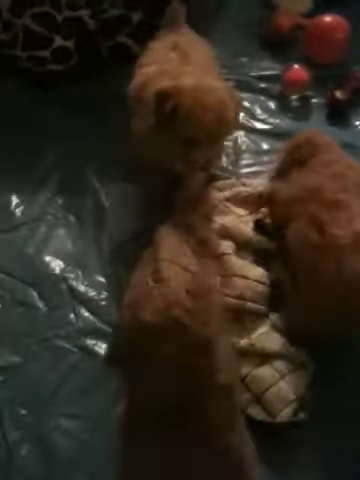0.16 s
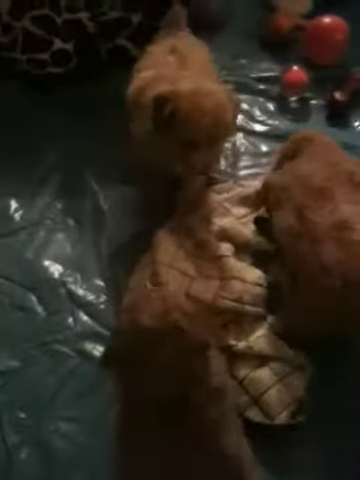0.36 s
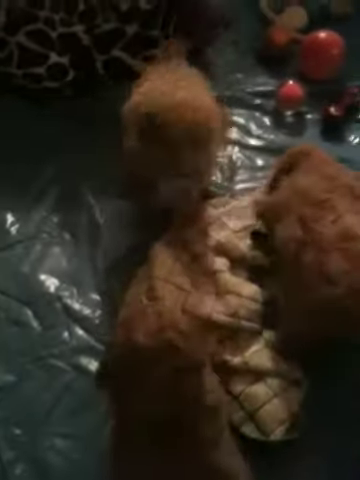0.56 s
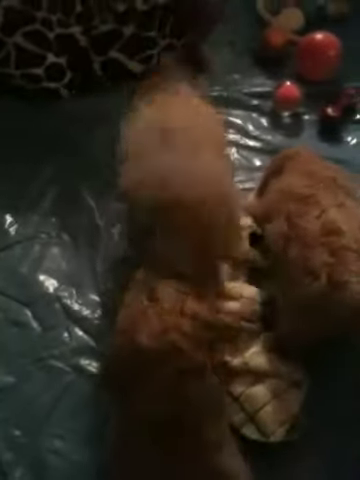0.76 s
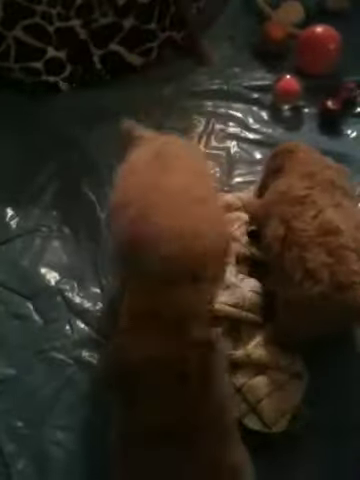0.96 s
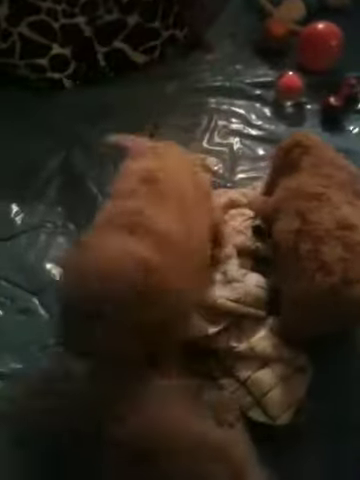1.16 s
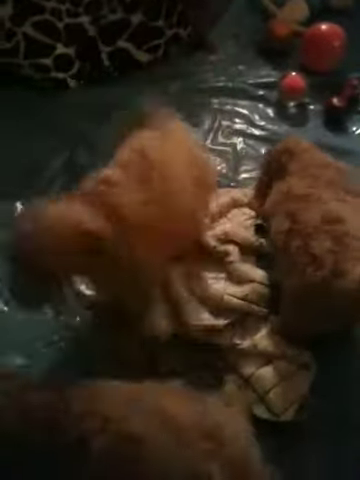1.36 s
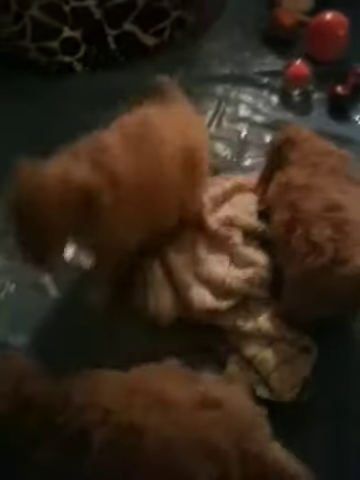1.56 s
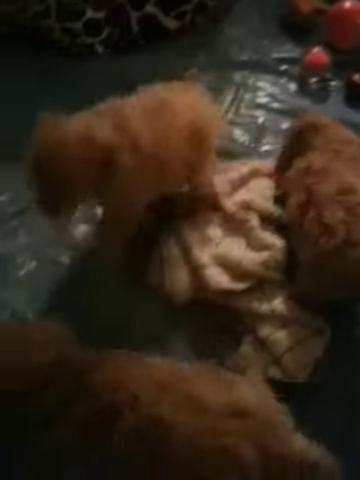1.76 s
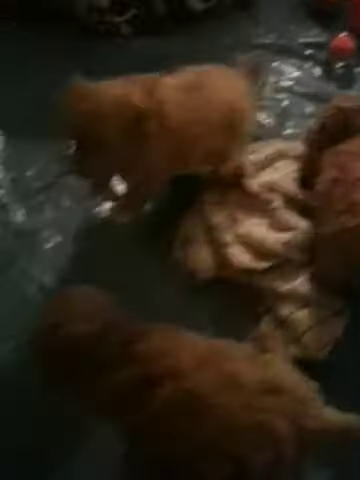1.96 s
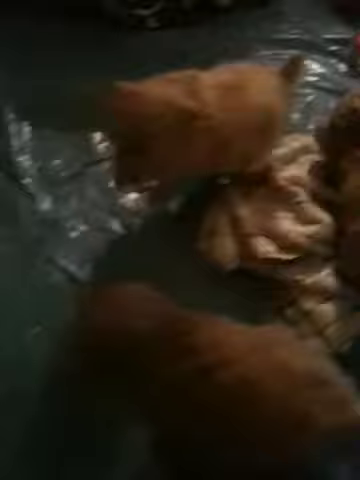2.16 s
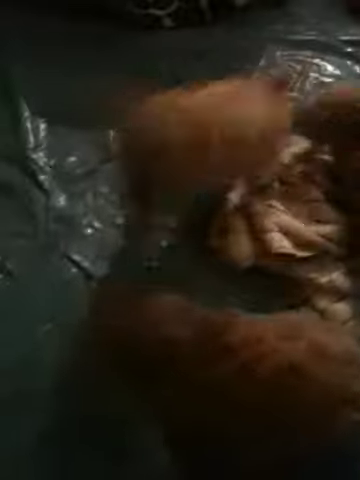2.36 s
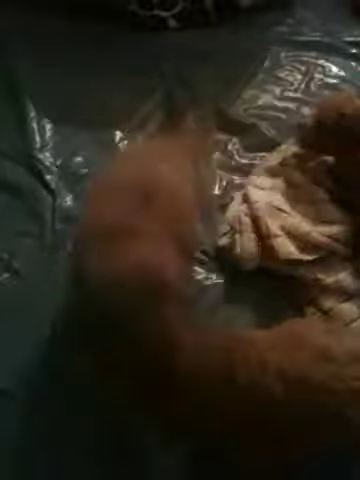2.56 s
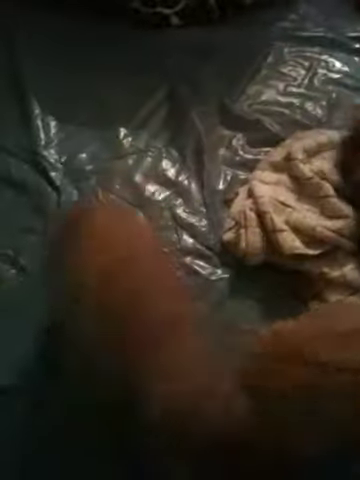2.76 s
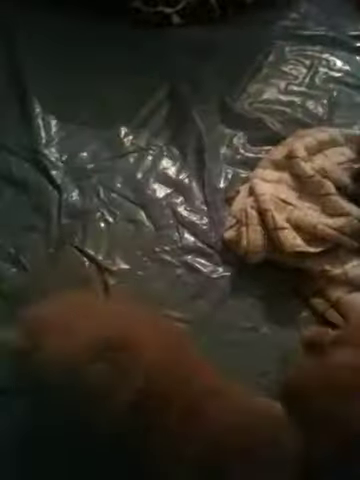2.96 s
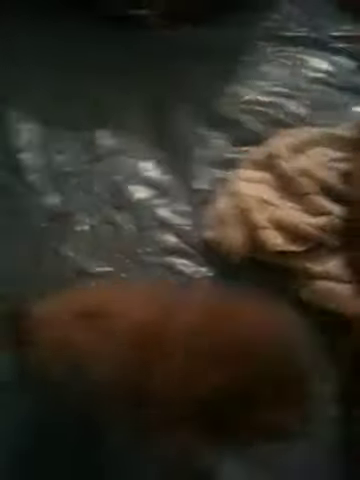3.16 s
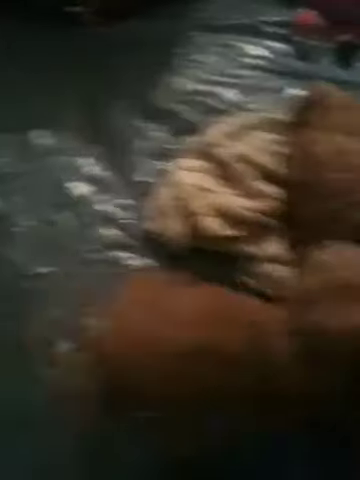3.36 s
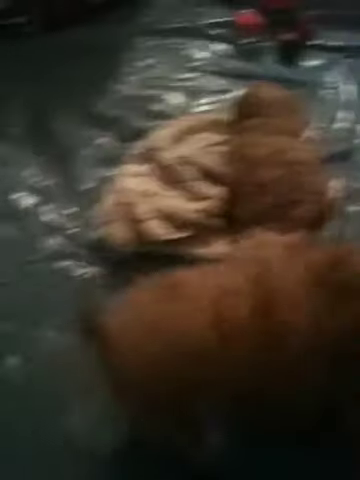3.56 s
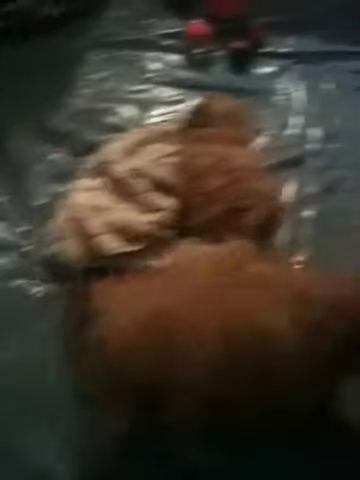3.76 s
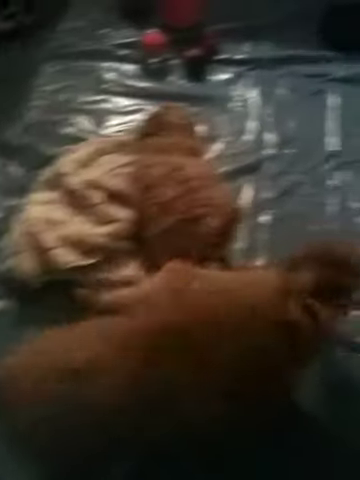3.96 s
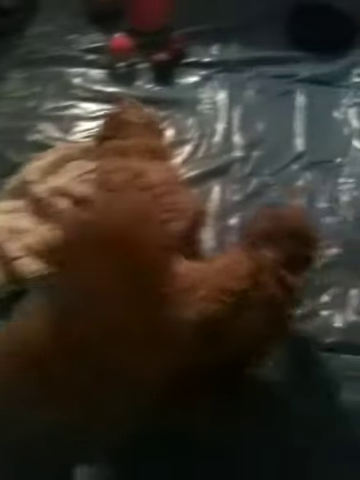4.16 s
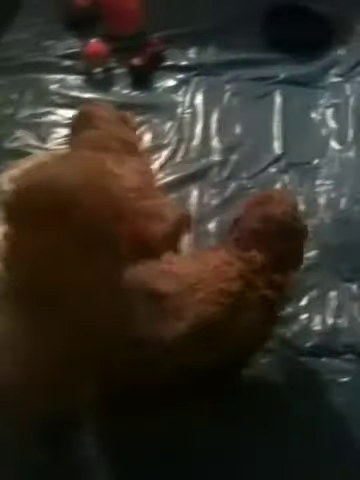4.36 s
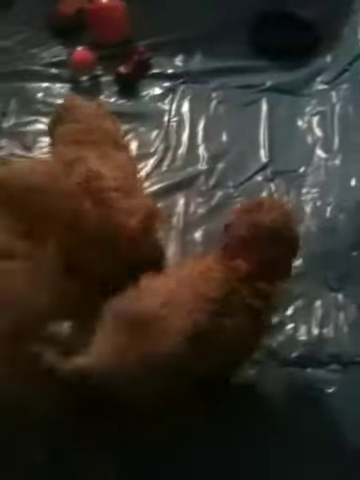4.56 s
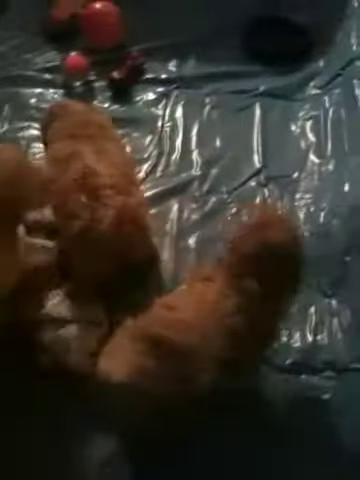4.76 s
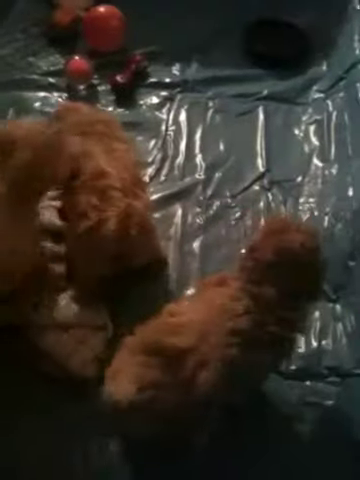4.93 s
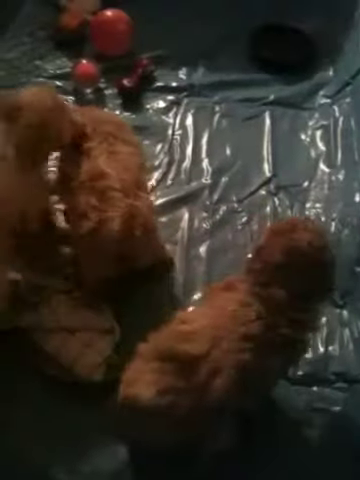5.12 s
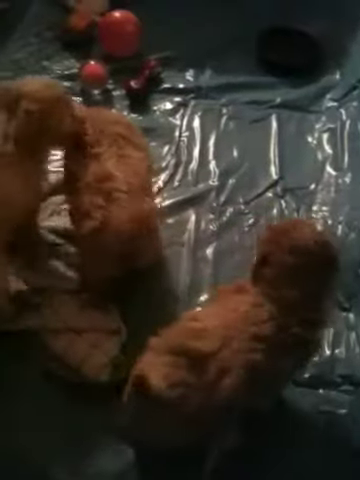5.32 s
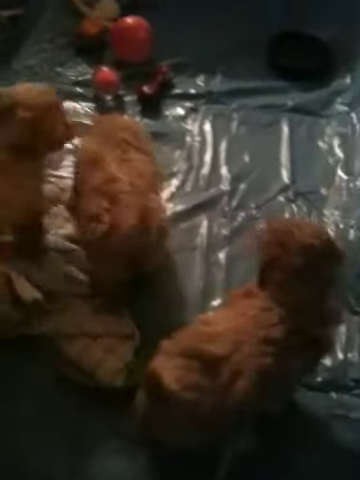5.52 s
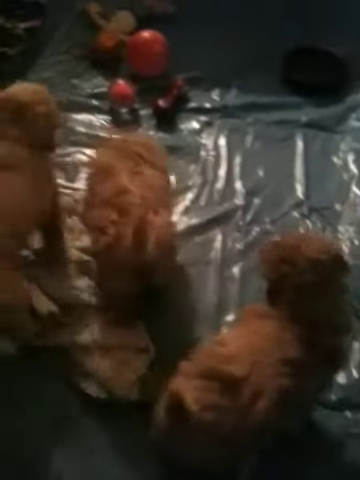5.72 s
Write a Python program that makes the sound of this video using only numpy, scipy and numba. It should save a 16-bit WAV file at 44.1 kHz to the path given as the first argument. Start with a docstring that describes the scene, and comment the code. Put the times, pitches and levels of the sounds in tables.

```python
"""Young puppies tussle on a plastic sheet in a small, quiet room, over faint air noise and mains hum.
A short growl opens the scene: uneven vocal-fold pulses excite the moving resonances of throat and mouth.
The sheet rustles by friction, bodies bump softly, and creases buckle under paws with a snap.
From 0.8 s come longer growls that throb about 25 times a second; after 3.9 s they are brief again.
Near 5 s a puppy huffs, forcing turbulent air through its nose."""
import sys
import numpy as np
from scipy import signal
from scipy.fft import rfft, irfft
from scipy.io import wavfile
from scipy.ndimage import uniform_filter1d
from numba import njit

SR = 44100
rng = np.random.default_rng(int(sys.argv[2]) if len(sys.argv) > 2 else 0)


def wav_out(sig):
    """Save sig, one row per channel (or a flat mono array), as 16-bit PCM at SR to the path in sys.argv[1]."""
    wavfile.write(sys.argv[1], SR, np.round(np.clip(np.atleast_2d(sig).T, -1, 1) * 32767).astype(np.int16))


N = 255334
TIME = np.arange(N) / SR


def undb(db):
    """Level in decibels to amplitude ratio."""
    return 10 ** (np.asarray(db) / 20)


def unit(x):
    """Normalisation to rms 1."""
    return x / np.sqrt(np.mean(x ** 2))


def steady(x, span_s=0.13):
    """Division by the running rms holds the short-term level constant."""
    size = int(span_s * SR)
    return x / np.sqrt(uniform_filter1d(uniform_filter1d(x ** 2, size), size) + 1e-18)


def curves(rows):
    """Linear interpolation of each column over the times in the first."""
    times, *columns = np.transpose(rows)
    return [np.interp(TIME, times, column) for column in columns]


def walk(rate):
    """Random modulation: straight lines between `rate` Gaussian values a second."""
    knots = rng.standard_normal(4096)
    return 0.51 * np.interp(TIME * rate, np.arange(len(knots)), knots)


def swells(rows):
    """Envelope of rounded peaks with exponential flanks, one per (t/s, level/dB, half length/s)."""
    return sum(undb(db) * np.exp(1 - np.hypot(1, (TIME - s) / half_s)) for s, db, half_s in rows)


def colour(x, points, size=1024):
    """Minimum-phase filter of unit power with the outline (f/Hz, level/dB)."""
    hz, db = np.transpose(points)
    grid = np.maximum(np.arange(size // 2 + 1) * SR / size, 1)
    cepstrum = irfft(np.log(undb(np.interp(np.log(grid), np.log(hz), db))))
    cepstrum[1:size // 2] *= 2
    cepstrum[size // 2 + 1:] = 0
    response = irfft(np.exp(rfft(cepstrum)))
    return signal.fftconvolve(x, response / np.linalg.norm(response))[:len(x)]


@njit
def svf(x, tuning, damping):
    """State-variable band-pass: two integrators in a loop form a tunable damped oscillator."""
    y, band, low = np.empty(len(x)), 0., 0.
    for i in range(len(x)):
        g, k = tuning[i], damping[i]
        v = (band + g * (x[i] + 1e-18 - low)) / (1 + g * (g + k))
        band, low, y[i] = 2 * v - band, low + 2 * g * v, k * v
    return y


def ring(x, hz, width_hz):
    """Second-order resonance with gain 1 at its centre."""
    hz = np.minimum(hz, SR / 3) * np.ones(len(x))
    return svf(x, np.tan(np.pi * hz / SR), width_hz / hz)


def formant(x, hz, width_hz, skirt_hz):
    """Three resonances in cascade give a sharp tip and steep skirts, held at a steady level."""
    return steady(ring(ring(ring(x, hz, width_hz), hz, skirt_hz), hz, skirt_hz))


# spectrum of the room air: f/Hz, level/dB
AIR_SPECTRUM = [(35, -63.5), (60, -19.5), (112, -10), (171, -3.5), (433, -8.5), (585, -11), (705, -12),
                (2250, -22), (9740, -22), (15500, -21)]


def background(hum_hz=121, hum_db=-80, air_db=-71.5):
    """Superposition of a mains tone, wavering in level, and the broadband noise of the room air."""
    hum = np.sqrt(2) * np.sin(2 * np.pi * hum_hz * TIME) * undb(hum_db + 1.1 * walk(1.8))
    return hum + undb(air_db) * colour(rng.standard_normal(N), AIR_SPECTRUM)


# growls: t/s, length/s, chest level/dB, level change/dB, attack/s, release/s, first, middle and last f/Hz,
# throb rate/Hz, its slowing/(Hz/s), throb depth/1, pitch swing in a throb/1
GROWL_GESTURES = [(0, 0.16, -45.5, -24, 0.0014, 0.058, 292.6, 278.3, 255, 16.7, 1, 0.046, 0.15),
                  (0.762, 0.43, -48, 0.5, 0.058, 0.06, 399.2, 431, 417, 24.8, 0, 0.27, 0.13),
                  (1.361, 0.38, -49, -2.5, 0.0076, 0.076, 384.8, 315, 175, 27.5, 0, 0.46, 0.27),
                  (1.945, 0.34, -52, -6, 0.0085, 0.0057, 255.4, 254.2, 262.5, 29.2, 7.5, 0.52, 0.36),
                  (2.283, 0.16, -56, -7.5, 0.0083, 0.024, 291, 321.2, 286, 24.4, 0, 0.74, 0.26),
                  (2.654, 0.097, -64.5, 3.5, 0.015, 0.011, 224, 220.3, 235, 9.9, 2, 0.0085, 0.089),
                  (2.745, .555, -45.5, -7, .04, 0.076, 305.1, 360.1, 320.4, 30.2, 16, 0.32, 0.42),
                  (3.482, 0.388, -46.5, -6, 0.02, 0.09, 285.1, 315.1, 304.6, 28.6, 0.5, 0.37, 0.34),
                  (3.905, .17, -57.5, 16.5, 0.013, 0.077, 270.2, 346, 330.6, 22.7, -0.5, 0.0034, 0.4),
                  (4.214, 0.08, -65, -7, 0.0198, 0.032, 271, 274, 260, 12, -3, 0, 0.21),
                  (4.366, 0.11, -54.5, -4, 0.027, 0.027, 263.2, 277, 253.7, 25.2, -2.5, 0.2, 0.14),
                  (4.592, 0.15, -48, -10, 0.038, 0.058, 254.5, 265, 229.5, 8.8, 0.5, 0.095, 0.2),
                  (4.867, 0.08, -58, 0.5, 0.025, 0.041, 349, 343.2, 326.6, 9.5, 0, 0, 0.2),
                  (5.14, 0.034, -61, 2, 0.019, 0.027, 340, 329, 332, 12.4, 1.5, 0, 0.39)]
# unevenness of vocal-fold closure, low where a growl clears into a tone: t/s, roughness/1
FOLD_ROUGHNESS = [(.1, .35), (.8, .5), (1, .7), (1.37, .3), (1.42, .4), (1.5, .58), (2.22, .65), (2.3, .15),
                  (2.7, .15), (2.78, .6), (3, .58), (3.2, .3), (3.5, .55), (4, .8), (4.25, .35), (4.42, .3),
                  (4.65, .55)]


def larynx(arch_db=5, pitch_sag=.3, gurgle_db=3.2, gurgle_pitch=.08):
    """Amplitude and frequency modulation: level and pitch follow effort, throbbing pressure and flutter."""
    rows = np.array(GROWL_GESTURES)
    current = np.maximum(np.searchsorted(rows[:, 0], TIME, "right") - 1, 0)
    (start, length, db, fade_db, attack, release,
     first_hz, middle_hz, last_hz, rate, slowing, depth, swing) = rows[current].T
    rough, = curves(FOLD_ROUGHNESS)
    age = TIME - start
    progress = np.clip(age / length, 0, 1)
    effort = np.clip(age / attack, 0, 1) ** .6 * np.clip((length - age) / release, 0, 1) ** 1.5
    gain = effort * undb(db + fade_db * progress + arch_db * np.sin(np.pi * progress))
    # throbs vary in timing and depth; each peaks early and then sags
    cycle = ((rate - slowing * age / 2) * age + .1 * walk(12)) % 1
    swell = np.sin(np.pi * cycle ** .72) - 2 / np.pi
    throb = np.maximum(1 + np.pi / 2 * depth * swell * (1 + 0.5 * walk(24)), 0)
    edge_hz = np.where(progress < .5, first_hz, last_hz)
    tune = middle_hz + np.abs(2 * progress - 1) * (edge_hz - middle_hz)
    hz = tune * (1 - pitch_sag * (1 - effort)) * (1 + swing * swell)
    gurgle = rough * walk(70)  # uneven flutter of the throat
    return gain * undb(gurgle_db * gurgle), throb, swell, hz * (1 + gurgle_pitch * gurgle), rough


@njit
def vocal_folds(hz, jitter, shimmer, chance):
    """Irregular oscillation: a pulse per closure, varying in period (jitter) and strength (shimmer)."""
    pulses, phases, phase, cycle = np.zeros(len(hz) + 1), np.empty(len(hz)), 0., 0
    for i in range(len(hz)):
        step = hz[i] * np.exp(jitter[i] * chance[cycle, 0]) / SR
        phase += step
        if phase >= 1:
            phase, cycle = phase - 1, cycle + 1
            # alternating strong and weak closures add a subharmonic
            size = np.exp(shimmer[i] * (chance[cycle, 1] + .6 * (-1) ** cycle))
            pulses[i] += size * phase / step
            pulses[i + 1] += size * (1 - phase / step)
        phases[i] = phase
    return pulses[:-1], phases


def chest_voice(source, phase, core_db=-13, nose_db=6):
    """Low resonances plus the fundamental of the smooth airflow; a nasal resonance lifts a narrow band."""
    chest = steady(ring(ring(source, 400, 370), 290, 270)) + undb(core_db) * np.cos(2 * np.pi * phase)
    chest = chest + undb(nose_db) * ring(chest, hz=429, width_hz=20)
    band = signal.butter(5, [195, 1150], "band", fs=SR, output="sos")
    return steady(signal.sosfilt(band, chest), span_s=0.0079)


# formants of the muzzle; in a wide snarl throat and mouth converge and grow loud: t/s;
# f/Hz of throat, mouth, cheek, lower teeth, upper teeth, lips;
# level/dB re the chest of throat, mouth, cheek, teeth, lips, hiss
MUZZLE_FORMANTS = [(.1, 720, 1990, 2170, 3400, 5800, 6340, -10, -15, -34, -39, -23, -20),
                   (.77, 730, 2000, 2150, 3500, 5330, 6150, 6.5, 4.5, -14, -24, -9, -9),
                   (.815, 790, 1920, 2270, 3530, 4930, 6100, 1, -6.5, -14, -13, -16, -19),
                   (.826, 897, 1900, 2680, 3520, 4770, 6000, 4.5, 6, 5, 5.5, 2, -15),
                   (.865, 950, 2000, 2110, 3700, 4920, 6030, 0.5, 11, -5, 9, 7.5, -7),
                   (.9, 1160, 1700, 2080, 3580, 4880, 7540, 0, 6.5, 8.5, 7.5, 2.5, -3),
                   (.945, 1490, 1430, 2200, 3480, 4570, 7760, 5.5, 12, 0, 5.5, -2.5, -7),
                   (1.01, 1345, 1375, 2080, 3060, 3460, 7600, 8, 16, 10, 13.5, -10, -17),
                   (1.045, 1362, 1439, 2100, 3420, 4100, 7300, 5, 16, 10.5, 8, -8, -11),
                   (1.075, 1030, 1500, 1960, 3900, 4000, 6850, 6.5, 8, 7.5, 3.5, -17, -3),
                   (1.15, 837, 1550, 2120, 4300, 4340, 6660, 5, 0, -4, -10.5, -21, -14),
                   (1.38, 976, 1730, 1966, 3855, 5055, 6600, 1.5, 2, -13, -4, -6, -7.5),
                   (1.46, 973, 1770, 2406, 4100, 4340, 6200, 1, -5, -5, 0, -16, -7),
                   (1.53, 950, 1740, 2440, 4300, 4200, 6060, 0.5, -2.5, -11, -2, -19, -9.5),
                   (1.66, 933, 1820, 2180, 4400, 4820, 6000, -2.5, -4.5, -5.5, -6, -14, -7),
                   (1.96, 791.3, 1950, 2320, 3214, 6077, 5880, -3, -12, -10, -19, -7.5, -17.5),
                   (2.2, 763, 1952, 2285, 3220, 6240, 5800, -0.5, -12, -15, -14.5, -10, -16),
                   (2.3, 679.3, 1957, 2198, 3360, 5750, 5800, 4, -9, -13.5, -18, -15, -24),
                   (2.38, 980, 2020, 2200, 3650, 4750, 6350, 7.5, -3.5, -12, -8, -8, -10),
                   (2.43, 968, 1944, 2250, 3705, 4800, 6320, 3, -19, -17, -18, -12, -16),
                   (2.66, 890, 1500, 2500, 3760, 4700, 6200, -18, -26, -24, -22, -22, -22),
                   (2.73, 940, 1444, 2552, 3740, 4700, 6250, -2, -7, -16, 0, -11, -22),
                   (2.77, 980, 1420, 2569, 3733, 4690, 6204, 5.5, -0.5, -11, 1, -9, -12),
                   (2.85, 1016, 1570, 2520, 3770, 4930, 6450, -0.5, 1.5, -11, -2, -10, -9.5),
                   (2.93, 990, 1730, 2535, 3732, 4336, 7540, -1.5, 1.5, -9, 2.5, -19, -7.5),
                   (3.05, 961.2, 1650, 2522, 3750, 4440, 7627, -1.5, 3.5, -9.5, 1, -25, -12.5),
                   (3.12, 1014, 1733, 2506, 3840, 4947, 6200, -1.5, -3, -5, 0.5, -18, -9),
                   (3.16, 852.3, 1258, 2387, 4200, 5040, 5700, 2.5, -5.5, -4.5, -10, -6, -8),
                   (3.22, 742, 1167, 2272, 4545, 5420, 6430, 2, -3, -10.5, -19, -15, -17),
                   (3.48, 870, 1410, 2090, 3700, 4555, 6665, 1, -6, -4, -11, -23, -15),
                   (3.535, 900, 1390, 2100, 3740, 4564, 6600, 4, -9, -8.5, -12, -19, -9),
                   (3.58, 982, 1600, 2500, 3830, 4448, 6415, 1, -6.5, -14, -15.5, -22, -28),
                   (3.635, 1061, 1845, 2620, 3970, 4225, 5402, 4, 1.5, -1.5, -1, -4.5, -9),
                   (3.69, 975, 1854, 2631, 3950, 4118, 5540, 2, 0, -2.5, -4, -13, -1.5),
                   (3.78, 1100, 1624, 2320, 3909, 4702, 6514, -2, 2.5, -3, -10, -25, -18),
                   (3.92, 745.5, 1820, 2154, 3500, 5782, 6966, -3, -24, -27, -30, -31, -23),
                   (4.04, 850, 1795, 2120, 3647, 5805, 7050, -1.5, -13.5, -14, -19, -20, -14.5),
                   (4.4, 819.4, 2210, 2380, 3687, 5780, 6715, -1.5, -13.5, -14.5, -25, -24, -23),
                   (4.65, 893, 1790, 2521, 3486, 4210, 6500, -6.5, -13.5, -13.5, -11.5, -22, -22)]


def growls(jitter=.145, shimmer=.4, quiver=.015, wander=0.069, lip_flap=.07):
    """Source-filter principle: fold pulses and breath excite formants that move with jaw and lips."""
    gain, throb, swell, hz, rough = larynx()
    *centres, throat_db, mouth_db, cheek_db, teeth_db, lips_db, hiss_db = curves(MUZZLE_FORMANTS)
    # the soft muzzle quivers with each throb, and every resonance wanders a little
    throat_hz, mouth_hz, cheek_hz, lower_hz, upper_hz, lips_hz = (
        centre * (1 + quiver * swell + wander * walk(30)) for centre in centres)
    pulses, phase = vocal_folds(hz, jitter * rough, shimmer * rough, rng.standard_normal((8192, 2)))
    pulses = steady(pulses)
    # air escapes once a cycle and carries more of the treble than of the bass
    air = steady(rng.standard_normal(N) * np.exp(-phase / 1.1))
    dark, warm, bright = (pulses + share * rough * air for share in (.25, .7, 1.4))
    rattle = undb(-4.5) * rough * formant(air, 263.5, 110, 190)  # the loose throat
    throat = steady(formant(warm, throat_hz, 200, 320) + undb(-0.5) * formant(warm, 604, 300, 650))
    spit = undb(-24.5) * formant(air, 11270, 3500, 3700)  # hiss of the open jaws
    mouth = formant(bright, mouth_hz, 300, 800) + spit
    cheek = formant(bright, cheek_hz, 278.5, 750)
    teeth = steady(formant(bright, lower_hz, 220, 900) + undb(-1.5) * formant(bright, upper_hz, 480, 1900))
    lips = formant(bright, lips_hz * (1 + lip_flap * (throb - 1)), 630, 2700)
    hiss = formant(air, 6930, 3200, 11000)
    low = chest_voice(dark, phase) + rattle + undb(throat_db) * throat
    middle = undb(mouth_db) * mouth + undb(cheek_db) * cheek + undb(teeth_db) * teeth
    high = undb(lips_db) * lips + undb(hiss_db) * hiss
    return gain * (throb * (low + high) + throb ** 0.45 * middle)


# the sheet sliding under the puppies: t/s, level/dB, half length/s
SHEET_SLIDES = [(.05, -67.5, 0.11), (.3, -88, 0.04), (.44, -64, 0.023), (.62, -64.5, 0.012),
                (.72, -72, 0.041), (1.2, -57, 0.04), (1.275, -59.5, 0.026), (1.8, -60.5, 0.056),
                (2.42, -57, 0.045), (2.65, -67.5, 0.095), (3.36, -63, 0.099), (4.1, -56, 0.021),
                (4.46, -66, 0.028), (4.68, -67, 0.063), (5, -71, 0.033), (5.39, -65.5, 0.047)]
# spectrum of the sliding hiss: f/Hz, level/dB
FRICTION_SPECTRUM = [(88, -36), (150, 0.5), (708, -4.5), (930, -4.5), (1400, -4.5), (1540, -2.5),
                     (2550, -8.5), (5130, -6), (7000, -2.5), (14100, -21.5), (15500, -22)]


def rustle(crackles_per_s=420, spread_db=3, crackle_db=-1.5, contact_db=-75.5):
    """Friction noise: fur and paws, never quite still, drag over plastic whose tiny creases give way."""
    grains = (rng.random(N) < crackles_per_s / SR) * rng.standard_normal(N)
    grains *= undb(spread_db * np.minimum(rng.exponential(size=N), 3))
    crackles = unit(colour(grains, CREASE_SPECTRUM))
    friction = unit(colour(rng.standard_normal(N), FRICTION_SPECTRUM) + undb(crackle_db) * crackles)
    # a paw loads the sheet just before each snap
    crinkles = swells([(s - 0.0027, db - 44.5, 0.019) for s, db, *_ in CREASE_SNAPS])
    return friction * (undb(contact_db) + swells(SHEET_SLIDES) + crinkles) * undb(6.1 * walk(31))


# soft impacts of paws and bodies: t/s, level/dB, f/Hz
BODY_BUMPS = [(.14, -51.5, 766), (0.241, -57.5, 159), (0.281, -59.5, 169), (4.877, -55.5, 200)]


def bumps(rise_cycles=1.44):
    """Damped oscillation: each soft impact builds up and dies away within a few swings."""
    out = 0
    for s, db, hz in BODY_BUMPS:
        t = np.maximum(TIME - s, 0)
        rise = hz * t / rise_cycles
        out = out + undb(db) * rise * np.exp(1 - rise) * np.sin(2 * np.pi * hz * t)
    return out


# creases that snap under a paw: t/s, relative level/dB, f/Hz, 60 dB decay time/s
CREASE_SNAPS = [(0.1796, -49.5, 2750, 0.02), (0.394, -46.5, 4460, 0.041), (0.4276, -44, 2959, 0.045),
                (0.9564, -28.5, 3487, .012), (1.112, -26.5, 4000, 0.03), (1.169, -28, 4150, 0.018),
                (1.2318, -27, 7000, 0.013), (1.342, -39, 3980, 0.025), (1.7969, -38.5, 6614, 0.042),
                (2.337, -43, 3435, 0.041), (2.4129, -30, 2995, 0.017), (2.505, -43.5, 2220, 0.012),
                (2.5165, -31, 3940, 0.035), (2.5809, -31, 1890, 0.027), (2.657, -27.5, 3900, 0.018),
                (2.6927, -36, 1881, 0.027), (2.7746, -28.5, 4337, 0.042), (2.8491, -23.5, 3900, 0.034),
                (2.9689, -30, 3504, 0.027), (2.987, -30.5, 3540, 0.028), (3.234, -33, 6200, 0.026),
                (3.3212, -45, 3376, 0.034), (3.3803, -41, 6240, .012), (3.3871, -34, 6926, 0.03),
                (3.4348, -34, 3730, 0.032), (3.47, -25.5, 4260, 0.029), (3.5841, -31, 4000, 0.033),
                (3.7943, -26.5, 4050, 0.016), (3.866, -40, 6156, .015), (3.8763, -33, 4074, 0.018),
                (3.9533, -40.5, 3518, 0.03), (4.095, -40, 2480, .025), (4.436, -47, 6140, .015),
                (4.444, -42, 4004, 0.029), (4.464, -46, 6770, .012), (4.475, -44, 6470, .012),
                (4.486, -33.5, 6760, 0.012), (4.5335, -48, 3035, 0.011), (4.561, -46.5, 6970, 0.018),
                (4.5726, -37.5, 4300, 0.024), (4.6776, -41, 3977, 0.037), (4.71, -41, 3503, 0.034),
                (4.729, -32, 2450, 0.016), (4.78, -35.5, 3897, 0.1), (4.839, -29, 6750, 0.028),
                (5.014, -52, 6950, .012), (5.469, -43.5, 6670, 0.04), (5.506, -53, 3200, 0.0095)]
# spectrum of a buckling crease: f/Hz, level/dB
CREASE_SPECTRUM = [(120, -10), (200, -6.5), (1010, -13), (2380, -2.5), (3010, -4), (3750, -1), (4840, -3.5),
                   (6590, -2), (11200, -11.5), (13400, -30), (15500, -26)]


def snaps(buckle_s=0.0022, tick_gap_s=.007, fold_hz=7000, lead_s=.02, size=8192):
    """Buckling: a crease gives way in a burst and rings out; smaller folds tick just before and after."""
    out = np.zeros(N + size)
    t = np.arange(size) / SR - lead_s
    for s, db, hz, t60 in CREASE_SNAPS:
        noise, crumple = rng.standard_normal((2, size))
        before, after, pitch = rng.uniform(.6, 1.4, 3)
        rise = np.exp(np.minimum(t, 0) / 0.0012)
        burst = np.exp(-np.maximum(t - buckle_s, 0) / 0.0008)
        tail = undb(-2) * np.exp(-np.log(1000) * np.maximum(t, 0) / t60)
        ticks = sum(undb(-15) * np.exp(-np.abs(t - lag * tick_gap_s) / 0.00027) for lag in (-before, after))
        folding = 0.031 * crumple * np.abs(crumple) * np.exp(-np.maximum(t / 0.037, -t / 0.0014))
        blow = colour(noise * (rise * np.maximum(burst, tail) + ticks) + folding, CREASE_SPECTRUM)
        snap = blow + 2.17 * ring(blow, hz, 600) + 1.8 * ring(blow, fold_hz * pitch, 600)
        start = int((s - lead_s) * SR)
        out[start:start + size] += undb(db) * 6 * snap / np.linalg.norm(snap)
    return out[:N]


# puffs of air through a puppy's nose: t/s, level/dB, half length/s
NOSE_HUFFS = [(4.92, -44, 0.018), (5.171, -52, 0.013), (5.35, -51.5, 0.0033)]
# spectrum of a puff: f/Hz, level/dB
HUFF_SPECTRUM = [(350, -57.5), (600, -43), (1070, -2.5), (1360, -13), (2190, 1), (2370, 4), (4230, -1.5),
                 (4650, 1.5), (5040, -1.5), (7250, 4.5), (8750, -12.5), (11900, -14), (13300, -24),
                 (14200, -43.5), (15000, -34)]


def huffs():
    """Turbulence: air forced through the nose makes short swells of noise."""
    return swells(NOSE_HUFFS) * colour(rng.standard_normal(N), HUFF_SPECTRUM)


def room(x, early_db=-10, late_db=-21, t60=0.075, size=16384):
    """Reverberation: early reflections from floor and furniture, then a short diffuse tail."""
    t = np.arange(size) / SR
    early, late = rng.standard_normal((2, size))
    early = unit(early * (t > .002) * np.exp(-t / 0.0097))
    late = unit(ring(late, 1000, 4600) * (t > .012) * np.exp(-np.log(1000) * t / t60))
    response = (undb(early_db) * early + undb(late_db) * late) / np.sqrt(size)
    return x + signal.fftconvolve(x, response)[:N]


def scene():
    """Superposition: puppies and sheet sound in the room over its background, in one channel."""
    direct = growls() + snaps() + bumps() + rustle() + huffs()
    return (room(direct) + background())[None]


def record(dry, bass_hz=70, top_hz=15800):
    """Band limiting: a phone microphone thins the bass and cuts the top steeply."""
    thin = signal.sosfilt(signal.butter(1, bass_hz, "high", fs=SR, output="sos"), dry)
    return signal.sosfilt(signal.ellip(10, .2, 70, top_hz, fs=SR, output="sos"), thin)


dry = scene()
out = record(dry)
wav_out(out)
```